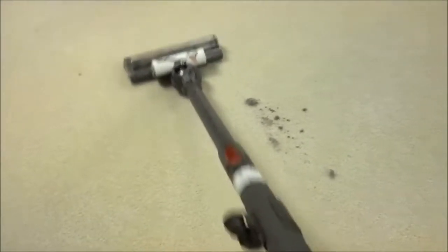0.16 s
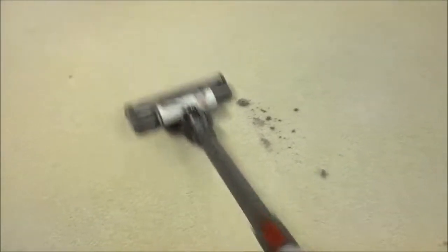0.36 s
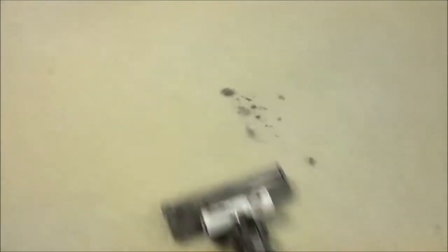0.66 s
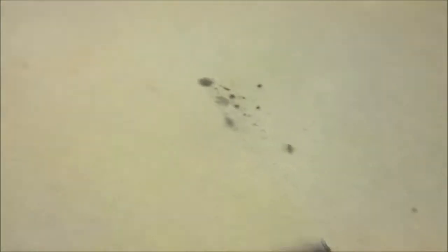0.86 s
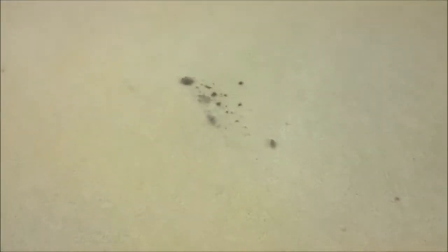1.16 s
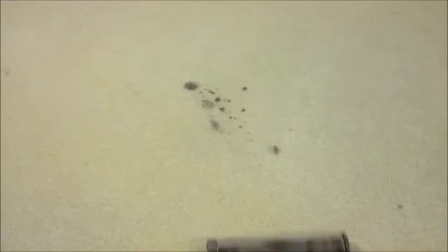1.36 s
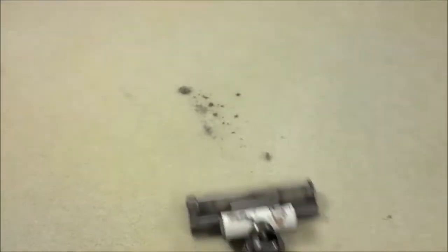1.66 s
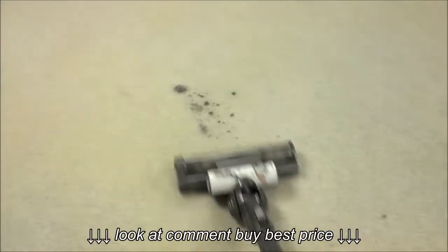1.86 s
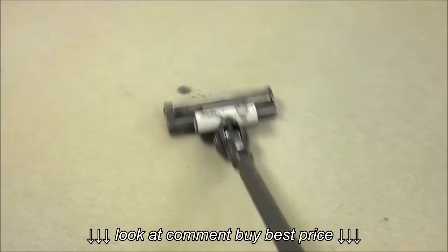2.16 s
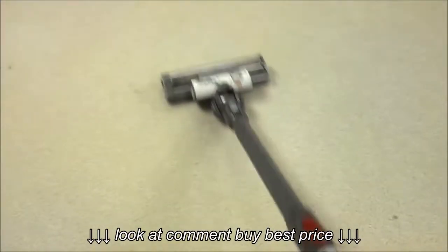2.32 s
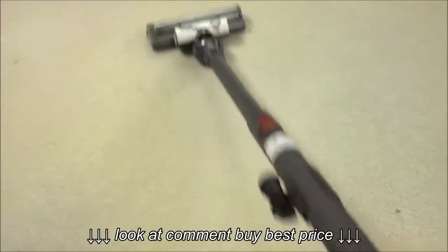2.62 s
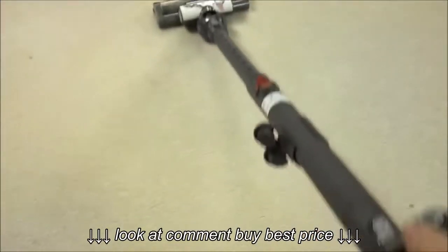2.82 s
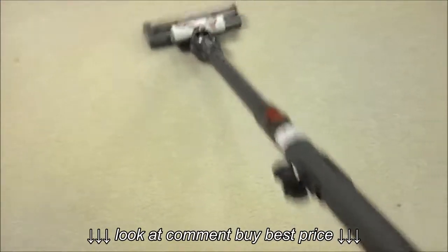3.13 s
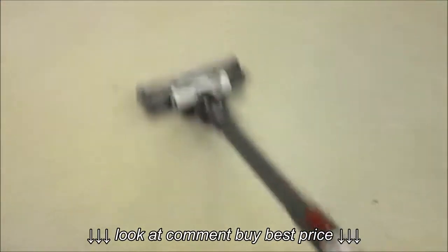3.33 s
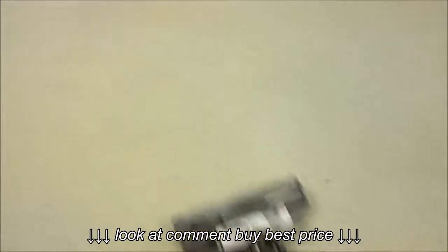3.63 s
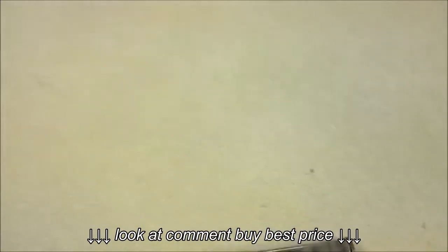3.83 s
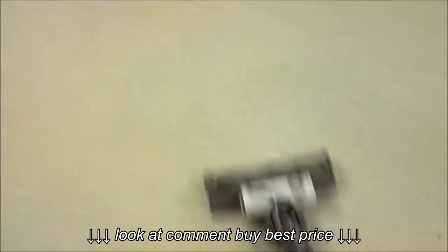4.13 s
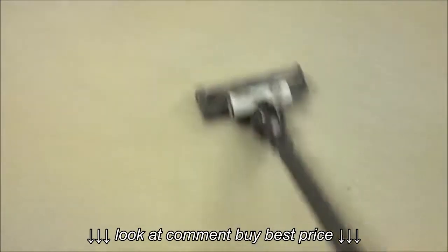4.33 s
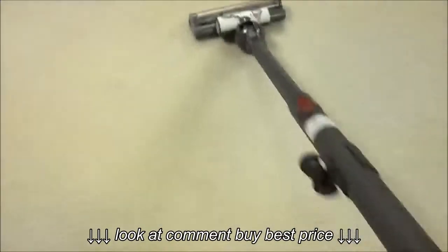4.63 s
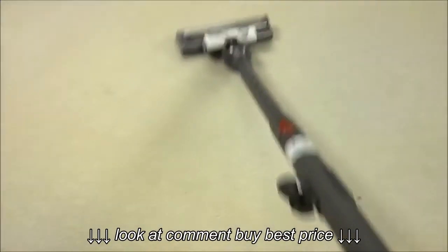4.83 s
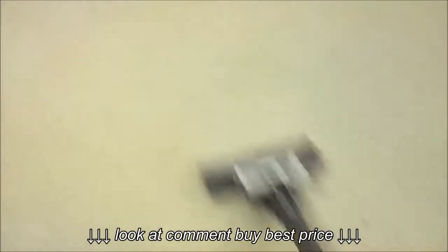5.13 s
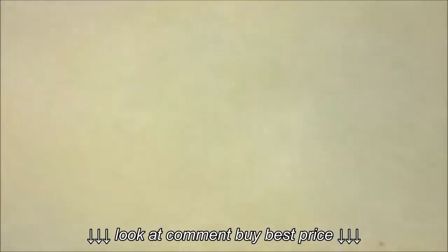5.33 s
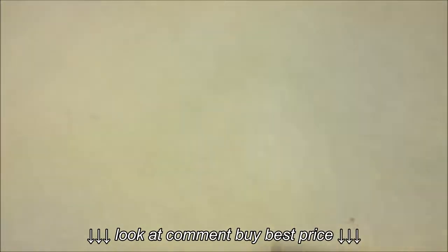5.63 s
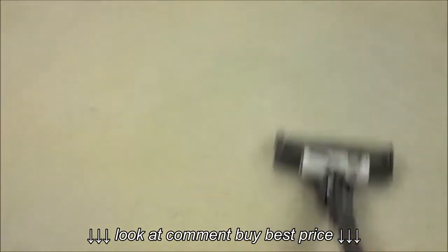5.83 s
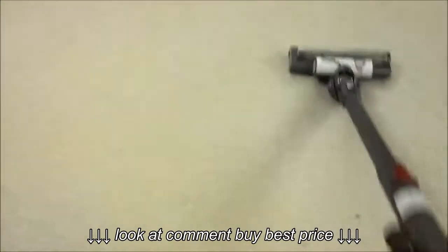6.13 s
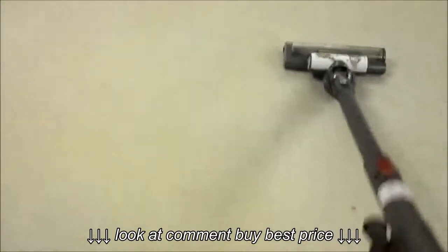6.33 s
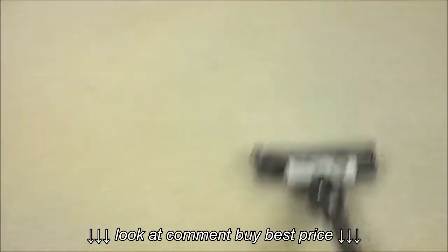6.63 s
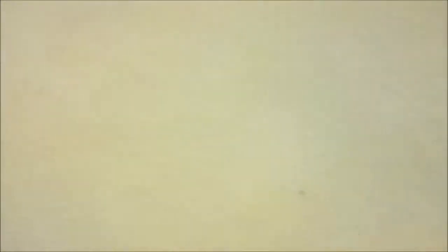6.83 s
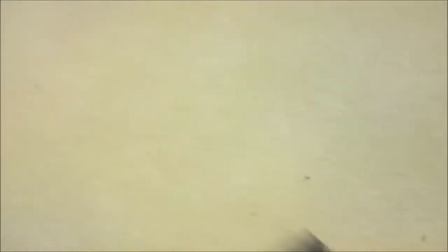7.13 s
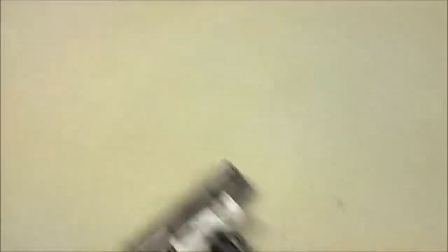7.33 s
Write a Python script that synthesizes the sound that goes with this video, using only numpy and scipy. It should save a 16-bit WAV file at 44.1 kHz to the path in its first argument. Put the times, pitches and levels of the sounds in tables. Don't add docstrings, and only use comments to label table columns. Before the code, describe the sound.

A vacuum cleaner already running, heard close with one phone microphone in a carpeted room. Broadband roar and airy high hiss dominate, over a fainter motor whine. The high brush whine rises and falls with push and pull; hollow knocks come just past two seconds, a brief rising whistle past three, deep bogging at four and five and a half, then loud rattling ticks near seven.

```python
import sys
import numpy as np
from scipy import signal
from scipy.fft import rfft, irfft, next_fast_len
from scipy.io import wavfile
from scipy.ndimage import uniform_filter1d

SR = 44100
rng = np.random.default_rng(int(sys.argv[2]) if len(sys.argv) > 2 else 0)


def log_audio(samples):
    frames = np.atleast_2d(samples).T
    limited = np.clip(frames, -1, 1)
    pcm = np.round(limited * 32767).astype(np.int16)
    wavfile.write(sys.argv[1], SR, pcm)


def linear_from_db(decibels):
    return 10 ** (np.asarray(decibels, float) / 20)


N = 329427
TIME = np.arange(N) / SR

# (time [s], suction [dB], gap under front lip [dB], weight on brush [dB])
SUCTION = [(0.0, -34.5, -4.5, -6), (0.87, -33.5, -3, -3.5), (0.94, -29, -6, -7.5), (1.39, -37, -4, -4),
           (2.21, -32, -6, -5.5), (2.93, -31.5, -8.5, -9), (3.08, -33.5, -1.5, -4), (3.89, -33, -5, -5),
           (4.14, -35, -7, -6.5), (4.76, -38.5, -6, -4), (5.14, -33, -2.5, -5), (5.91, -34.5, -6, -7.5),
           (6.18, -33, -8, -9), (6.32, -37, -6.5, -5.5), (6.95, -33, 0.5, -4.5), (7.2, -37.5, 3, -1.5),
           (7.41, -39, -5, -2), (7.47, -39, -2, 1)]
# (frequency [Hz], density [dB per Hz])
AIR_COLOUR = [(15, -60), (25, -30), (66, -23.5), (112, -15), (146, -11), (254, -5), (308, -5), (373, 0),
              (576, 1), (682, -8.5), (1190, -5.5), (2640, -7.5), (5060, -9.5), (6760, -11.5), (8000, -7.5),
              (10400, -38), (17600, -120)]
ROAR_EDGES_HZ = [20, 660, 1600, 2750, 4050]
# (usual level [dB], share of suction [dB/dB], share of gap [dB/dB], change at full stall [dB])
ROAR_LAYERS = [
    (-43, 0.42, 0.19, -1),
    (-38, 0.73, 0.3, -1.5),
    (-36.5, 0.63, 0.28, 1),
    (-39, 0.64, 0.89, 2),
]
# (middle [s], dwell [s], level over usual rumble [dB])
DIRT_IN_HOSE = [(.6, .1, 2), (2.1, 0.34, 2), (2.8, 0.35, 0.5), (3.3, 0.26, 2), (5.0, .1, 1.5)]
# (middle [s], dwell [s], level over usual roar [dB])
BOOMS = [(.33, 0.3, 1), (3.35, .2, 0.5), (5.12, .1, 1.5), (6.93, .2, -0.5)]
# (middle [s], dwell [s], level over usual rush [dB])
GULPS = [(.97, .1, 2.5), (3.3, 0.2, 0.5), (5.36, 0.13, 2), (7.05, 0.36, 0)]
BRISTLE_EDGES_HZ = [4050, 7200]
# (frequency [Hz], density [dB per Hz])
JET_COLOUR = [(6800, -7), (8000, -4), (8900, 0), (9800, -3.5), (11200, -7), (11800, -7), (12300, -2),
              (12700, -2.5), (13400, 0), (14300, -2.5), (15000, .5), (15750, 3.5)]
JET_EDGES_HZ = [7200, 10000, 11800, 12500, 14200, 15200, 17000]
# (middle [s], dwell [s], level [dB])
LOW_JET = [(.08, 0.28, -39.5), (.4, 0.089, -29.5), (.62, .05, -39.5), (1.85, 0.23, -40), (2.25, 0.28, -38),
           (2.65, 0.31, -37), (3.03, .1, -44), (3.28, 0.19, -29.5), (3.52, .05, -46), (4.32, .05, -38.5),
           (4.7, 0.37, -40.5), (5.03, .2, -37), (5.38, 0.29, -41.5), (6.0, 0.42, -37), (6.55, 0.41, -37)]
# (middle [s], dwell [s], level [dB])
MIDDLE_JET = [(.25, 0.44, -36), (.95, .4, -39), (1.85, .25, -39), (2.25, 0.3, -34.5), (2.63, 0.22, -33.5),
              (2.95, .2, -38), (3.27, .22, -35), (4.48, 0.24, -33), (4.8, .1, -38), (5.02, 0.14, -33),
              (5.52, .22, -40), (6.18, 0.29, -34), (6.5, 0.16, -34), (6.8, .15, -45), (7.06, 0.079, -35),
              (7.3, .2, -46.5)]
# (middle [s], dwell [s], level [dB])
TOP_JET = [(.32, .35, -37), (.72, .2, -30.5), (1.1, 0.42, -32.5), (1.67, .55, -31.5), (2.78, .22, -34),
           (3.2, .4, -32), (3.62, .25, -30.5), (4.05, 0.2, -30), (4.66, .05, -40), (5.27, .06, -32),
           (5.74, 0.092, -32.5), (6.22, .2, -38), (6.78, .17, -30.5), (7.35, 0.076, -29.5)]
# (middle [s], dwell [s], level over usual hiss [dB])
SIDE_LEAK = [(.15, .4, 2), (2.72, .1, 1), (3.2, .1, 1), (4.8, .1, 4), (5.42, 0.24, 4), (6.72, .1, 2.5)]
# (time [s], blade rate [Hz])
TURBINE_SPEED = [(0, 3010), (.2, 2950), (.4, 2880), (.85, 2840), (1.32, 2835), (1.45, 2930), (1.66, 3052),
                 (2.0, 3115), (2.5, 3210), (2.82, 3410), (2.99, 3490), (3.1, 3250), (3.22, 3060),
                 (3.6, 2775), (3.75, 2720), (4.0, 2800), (4.1, 2960), (4.25, 3008), (4.73, 3380),
                 (5.15, 3020), (5.3, 2985), (5.6, 2940), (6.2, 2950), (6.37, 3105), (6.5, 3080),
                 (6.7, 3100), (7.05, 3085), (7.22, 3100), (7.33, 3270)]
# (time [s], hold [s], share of a full stall [0-1])
STALLS = [
    (1.12, 0, .28),
    (3.95, .07, .65),
    (5.52, 0, .98),
]
# (multiple of blade rate [ratio], trim [dB], unsteadiness [dB])
PARTIALS = [
    (1, -1, 1.0),
    (2, -2.5, 1.8),
    (3.667, -.5, 1.8),
    (.69, -5, 3.0),
]
# (middle [s], dwell [s], level [dB])
BLADE_TONE = [(.2, .06, -43), (.37, .03, -46), (.75, .1, -50), (.97, .1, -42), (1.1, .12, -42),
              (1.23, .1, -41.5), (1.5, .1, -46), (1.78, .28, -41), (2.1, .28, -43.5), (2.4, .14, -49),
              (2.52, .04, -44.5), (2.65, .08, -42), (2.8, .2, -43.5), (2.98, .07, -43), (3.07, .06, -45),
              (3.67, .06, -41), (3.74, .04, -47.5), (3.81, .04, -41.5), (3.94, .12, -39.5),
              (4.04, .04, -48), (4.11, .07, -41.5), (4.17, .02, -46), (4.31, .06, -47.5), (4.75, .3, -47),
              (5.0, .1, -47), (5.2, .16, -45), (5.32, .05, -41), (5.49, .05, -41), (5.56, .05, -39.5),
              (5.66, .14, -42), (6.27, .03, -50), (6.48, .22, -41.5), (6.62, .06, -41.5), (6.7, .04, -37.5),
              (6.8, .14, -40.5), (6.92, .05, -38), (7.065, .03, -38), (7.11, .04, -34.5), (7.18, .07, -37),
              (7.27, .06, -47)]
# (middle [s], dwell [s], level [dB])
OCTAVE = [(.8, .45, -58), (1.25, .03, -54), (2.1, .75, -52.5), (2.72, .3, -52), (2.86, .04, -48),
          (2.97, .04, -44), (3.07, .04, -46), (3.16, .1, -44.5), (3.25, .03, -44), (3.9, .03, -55),
          (4.76, .35, -53), (7.08, .04, -52), (7.15, .2, -59.5)]
# (middle [s], dwell [s], level [dB])
BELT = [(.72, .6, -50), (1.25, .3, -53.5), (2.75, .1, -50), (3.45, .14, -46), (3.65, .2, -50.5),
        (3.87, .1, -44.5), (3.98, .04, -47), (4.25, .05, -53), (5.22, .1, -48), (5.38, .18, -45),
        (5.52, .06, -46), (5.76, .16, -48), (6.05, .3, -51), (6.26, .08, -51), (6.9, .55, -53.5)]
# (middle [s], dwell [s], level [dB])
INLET = [(.52, 0.37, -45), (1.72, 0.31, -42.5), (6.62, 0.28, -42.5)]
# (time [s], tick level [dB])
SNAG = [(0, -40), (.9, -40), (1.02, -33), (1.04, -40), (6.86, -40), (6.92, -30), (7.0, -30), (7.11, -28),
        (7.12, -42)]
# (time [s], peak level [dB])
HARD_TICKS = [(6.8604, -27), (6.8784, -27), (6.9296, -25), (6.9474, -28), (7.0165, -23), (7.0339, -26),
              (7.0514, -22), (7.0868, -24), (7.1048, -26)]
# (time [s], shaft level [dB], fan blade level [dB])
MOTOR = [(0, -53, -60), (.7, -49.5, -53), (1.3, -53, -56), (2, -51, -58), (2.7, -50, -54), (3.7, -51, -49),
         (4.05, -53, -50), (4.4, -55, -56), (4.8, -51, -50), (5.33, -52, -56), (5.5, -52, -50),
         (5.72, -52, -55), (6.05, -52, -49.5), (6.27, -52, -55), (6.7, -53, -51), (7, -62, -59),
         (7.47, -56, -56)]
# (time [s], share over usual speed [ratio])
MOTOR_LOAD = [(0, -.003), (1.3, -.002), (2.3, .002), (3.25, .002), (3.4, -.0035), (4.05, -.003), (4.3, 0),
              (5.2, 0), (5.45, -.002), (5.8, 0), (7.47, 0)]
# (middle [s], dwell [s], level [dB])
DRONE = [(.55, .4, -54), (1.75, .4, -57), (2.75, .4, -55.5), (4.75, .6, -55), (6.1, .25, -56)]
# (time [s], frequency [Hz], level [dB])
HOSE_MOAN = [(1.05, 470, -66), (1.2, 480, -52), (1.4, 510, -50), (1.6, 532, -51), (1.7, 535, -66),
             (1.75, 535, -90)]
# (time [s], frequency [Hz], level [dB])
REAR_WHISTLE = [(3.17, 1600, -55), (3.19, 1670, -41), (3.215, 1800, -40), (3.25, 1930, -44),
                (3.285, 2010, -35.5), (3.31, 2000, -50), (3.33, 2000, -90)]
# (time [s], frequency [Hz], level [dB])
LIP_WHISTLE = [(3.15, 3450, -60), (3.29, 3610, -52), (3.33, 3650, -40), (3.37, 3740, -43),
               (3.45, 3800, -55), (3.5, 3800, -90)]
# (time [s], peak level [dB], ring [Hz], decay by 60 dB [s])
LUMPS = [(2.1733, -22, 415, .034), (2.2923, -23.5, 430, .03), (2.3052, -30, 450, .018),
         (2.3156, -27, 520, .022), (4.984, -33, 350, .04), (7.1, -33, 400, .04), (2.4761, -21.5, 320, .014),
         (2.4786, -26.5, 440, .016), (2.4829, -17.5, 272, .026), (2.4765, -32, 1150, .03),
         (2.4831, -34, 1150, .02), (2.489, -33, 260, 0.07)]
# (time [s], depth [dB])
DUCKS = [(0.282, 3.5), (0.785, 1.5), (1.025, 2), (1.964, 0.6), (2.399, 1.5), (2.569, 0), (2.778, 2),
         (3.11, 3), (3.592, -0.5), (3.942, 2), (4.066, 2), (4.673, 1), (5.28, 2), (5.564, 1.5), (5.693, 3),
         (6.255, 2.5), (6.478, 1.5), (6.766, 2), (7.116, 2)]
PATCH_S = [.093, .209, .302, .325, .418, .488, .883, 1.324, 1.533, 1.904, 2.02, 2.067, 2.16, 2.253, 2.276,
           2.369, 2.74, 3.344, 3.507, 3.739, 3.785, 3.855, 4.203, 4.296, 4.319, 4.575, 4.969, 5.085, 5.108,
           5.55, 5.805, 6.014, 6.27, 6.502]
PATCH_EDGES = [196, 264, 320, 384, 448, 544, 608, 672, 732]
PATCH_CHANCE = [.1, .12, .14, .16, .1, .2, .2, .24]


def columns(table):
    s, *rest = np.transpose(table)
    return [np.interp(TIME, s, c) for c in rest]


def walk(rate):
    k = int(SR / rate)
    steps = np.repeat(rng.standard_normal(N // k + 1), k)
    return 1.309 * uniform_filter1d(uniform_filter1d(steps, k), k)[:N]


def passes(table, floor_db, sweep_db_s):
    t = TIME[::64]
    power = 0
    for s, dwell, db in table:
        away = np.maximum(np.abs(t - s) - abs(dwell) / 2, 0)
        power = power + linear_from_db(db - sweep_db_s * away) ** 2
    return np.interp(TIME, t, 10 * np.log10(np.maximum(power, linear_from_db(floor_db) ** 2)))


def swells(table):
    return passes(table, 0, sweep_db_s=45)


def rush(colour, lo_hz, hi_hz, skirt):
    size = next_fast_len(N)
    pitch = np.log(np.arange(1, size // 2 + 2) * SR / size)
    hz, db = np.transpose(colour)
    above_lo = np.tanh((pitch - np.log(lo_hz)) / skirt)
    above_hi = np.tanh((pitch - np.log(hi_hz)) / skirt)
    gain = linear_from_db(np.interp(pitch, np.log(hz), db)) * np.sqrt((above_lo - above_hi) / 2)
    x = irfft(rfft(rng.standard_normal(size)) * gain, size)[:N]
    return x / np.std(x)


def turbulence(levels, edges, colour, skirt, gust_db, flicker_db):
    bands = zip(levels, edges, edges[1:])
    return sum(linear_from_db(db + gust_db + flicker_db * walk(18)) * rush(colour, lo, hi, skirt) for db, lo, hi in bands)


def tone(hz, db, drift, flutter_db, rate):
    phase = 2 * np.pi * np.cumsum(hz * (1 + drift * walk(rate))) / SR
    return np.sqrt(2) * linear_from_db(db + flutter_db * walk(rate)) * np.sin(phase)


def stall():
    bog_s, free_s = .128, .162
    depth = 0
    for s, hold, share in STALLS:
        away = np.maximum(np.abs(TIME - s) - hold / 2, 0)
        depth = depth + share * np.exp(-(away / np.where(TIME < s, bog_s, free_s)) ** 2)
    return depth


def air_roar(suction, gap, seal):
    hose, mouth, throat, rotor = [db + a * suction + b * gap + c * stall() for db, a, b, c in ROAR_LAYERS]
    levels = [hose + swells(DIRT_IN_HOSE), mouth + swells(BOOMS), throat, rotor + swells(GULPS)]
    return turbulence(levels, ROAR_EDGES_HZ, AIR_COLOUR, skirt=0.066, gust_db=.5 * seal, flicker_db=0.082)


def bristles(suction, weight, low_jet, seal):
    level = -40 + 0.8 * suction + 0.88 * weight + 0.21 * (low_jet - low_jet.mean())
    return turbulence([level], BRISTLE_EDGES_HZ, AIR_COLOUR, skirt=0.026, gust_db=0.53 * seal, flicker_db=0.37)


def fringe(jet, full_db, trim_db):
    return full_db + trim_db + 1.2 * (jet - full_db)


def leaks(suction, low, middle, top, seal):
    side = -43.5 + 0.69 * suction + swells(SIDE_LEAK)
    levels = [low, side, fringe(middle, -33, -6.5), middle - 1.2, fringe(top, -28, -5.5), top - 2.2]
    return turbulence(levels, JET_EDGES_HZ, JET_COLOUR, skirt=0.041, gust_db=.5 * seal, flicker_db=0.36)


def standing_waves(x, ripple_db, width=3, frames=9):
    cells = signal.stft(x, nperseg=1024)[2]
    ripple = rng.standard_normal(cells.shape)
    ripple = uniform_filter1d(uniform_filter1d(ripple, width, axis=0), frames, axis=1)
    y = signal.istft(cells * linear_from_db(ripple_db * ripple / ripple.std()), nperseg=1024)[1][:N]
    return y * np.std(x) / np.std(y)


def airflow():
    seal = walk(14)
    suction, gap, weight = np.array(columns(SUCTION)) - [[-34.5], [-4.5], [-5]]
    beams = zip((LOW_JET, MIDDLE_JET, TOP_JET), (-43.5, -42.5, -40))
    low, middle, top = (passes(jet, off_beam_db, sweep_db_s=41.5) for jet, off_beam_db in beams)
    air = air_roar(suction, gap, seal) + bristles(suction, weight, low, seal)
    return standing_waves(air + leaks(suction, low, middle, top, seal), ripple_db=1.5)


def blade_rate():
    return columns(TURBINE_SPEED)[0] - 550 * stall()


def turbine():
    hz = blade_rate() * (1 + .008 * stall() * walk(60))
    beams = zip((BLADE_TONE, OCTAVE, BELT, INLET), (-57, -66, -60, -66))
    levels = [passes(table, faint_db, sweep_db_s=150) for table, faint_db in beams]
    tones = [tone(k * hz, db + trim_db, 0.002, flutter_db, 30)
             for db, (k, trim_db, flutter_db) in zip(levels, PARTIALS)]
    blur = (linear_from_db(-10) + .75 * stall()) * walk(300)
    return sum(tones) + blur * tones[0]


def brush():
    blades_per_turn, tick_s = 54.1, 7.087
    turns = np.cumsum(blade_rate()) / SR / blades_per_turn
    turns -= turns[int(tick_s * SR)]
    grain = rush([(800, -2), (3000, -7), (5500, 0), (9000, -10)], 900, 7500, .15)
    scratch = np.exp(-(turns % 1) / 0.065) * grain
    hard = sum(linear_from_db(db - 1.5) * (TIME >= s) * np.exp(-np.abs(TIME - s) / .0018) for s, db in HARD_TICKS)
    hard_grain = rush([(1200, 1), (2200, -8), (3800, -6), (4500, 0), (9000, -3)], 950, 6600, .08)
    return linear_from_db(columns(SNAG)[0] + 1.4 * walk(57)) * scratch + hard * hard_grain


def motor():
    shaft_hz, blades, mains_hz, drone_hz = 585.1, 11, 120, 255
    shaft_db, fan_db = columns(MOTOR)
    hz = shaft_hz * (1 + columns(MOTOR_LOAD)[0] + .0004 * walk(2.5))
    hum = tone(np.full(N, float(mains_hz)), -65.5, 0, 1.6, 2.1)
    drone = tone(np.full(N, float(drone_hz)), passes(DRONE, -70, sweep_db_s=45), 0.012, 2.5, 2.8)
    shaft = tone(hz, shaft_db - .5, 0.0007, 1.5, 8)
    fan = tone(blades * hz, fan_db - 2.5, .0008, 2.2, 9)
    return shaft + fan + hum + drone


def moan_and_whistles():
    curves = (HOSE_MOAN, REAR_WHISTLE, LIP_WHISTLE)
    return sum(tone(*columns(curve), .006, 1.9, 40) * (TIME > curve[0][0]) for curve in curves)


def dirt():
    out, t = np.zeros(N), TIME[:SR // 8]
    press = np.exp(-t / .00045)
    for s, db, hz, t60 in LUMPS:
        cycles = hz * t + .38 * (1 - press)
        decay = np.exp(-np.log(1000) * t / t60)
        i = int(s * SR)
        out[i:i + len(t)] += linear_from_db(db) * (1 + 1.3 * press) * np.sin(2 * np.pi * cycles) * decay
    return signal.sosfilt(signal.butter(2, 110, "high", fs=SR, output="sos"), out)


def scene():
    mono = airflow() + turbine() + brush() + motor() + moan_and_whistles() + dirt()
    return np.array([mono, mono])


def gain_control():
    recover_s = 0.18
    return linear_from_db(-sum(db * (TIME >= s) * np.exp(-np.abs(TIME - s) / recover_s) for s, db in DUCKS))


def noise_patches(x):
    frame, offset = 1024, 981
    out = x.copy()
    n = np.arange(2 * frame)
    window = np.sin(np.pi * (n + .5) / 2 / frame)
    picks = rng.random((len(PATCH_S), len(PATCH_EDGES) - 1))
    picks = (picks < PATCH_CHANCE) | (picks == picks.min(axis=1, keepdims=True))
    for moment, b in np.argwhere(picks):
        lo, hi = PATCH_EDGES[b:b + 2]
        start = offset + frame * round((PATCH_S[moment] * SR - offset) / frame - 1)
        phase = np.pi / frame * np.outer(np.arange(lo, hi) + .5, n + .5 + frame / 2)
        waves = np.sqrt(2 / frame) * window * np.cos(phase)
        band = out[:, start:start + 2 * frame] @ waves.T
        noise = rng.standard_normal((2, hi - lo))
        out[:, start:start + 2 * frame] += (noise * np.std(band) / np.std(noise) - band) @ waves
    return out


def band_limit(x):
    return signal.sosfilt(signal.butter(12, 16150, fs=SR, output="sos"), x)


def record(dry):
    size = next_fast_len(N)
    below_top = np.arange(size // 2 + 1) * SR / size < 15735
    mix = irfft(rfft(dry * gain_control(), size) * below_top, size)[:, :N]
    mix = noise_patches(mix)
    return band_limit(mix)


dry = scene()
out = record(dry)
log_audio(out)
```